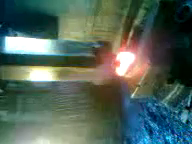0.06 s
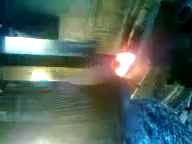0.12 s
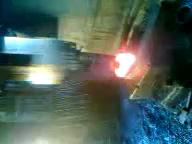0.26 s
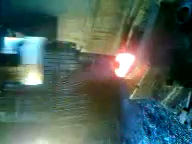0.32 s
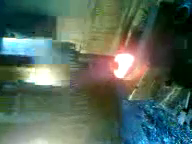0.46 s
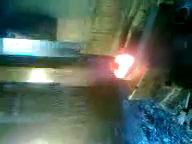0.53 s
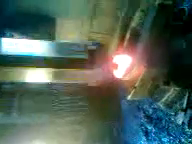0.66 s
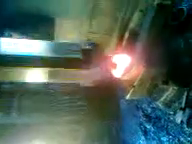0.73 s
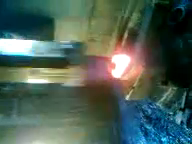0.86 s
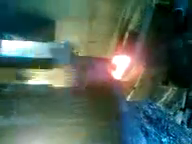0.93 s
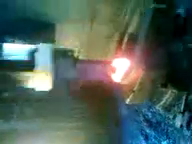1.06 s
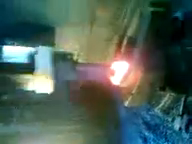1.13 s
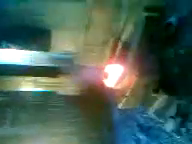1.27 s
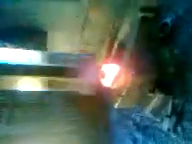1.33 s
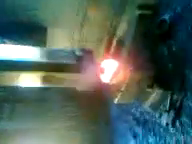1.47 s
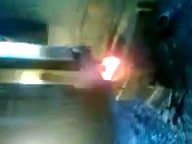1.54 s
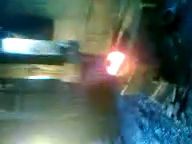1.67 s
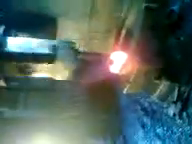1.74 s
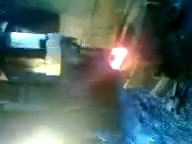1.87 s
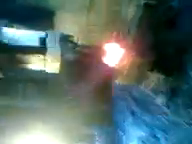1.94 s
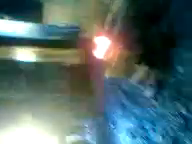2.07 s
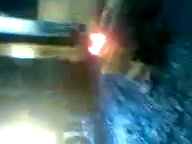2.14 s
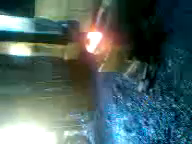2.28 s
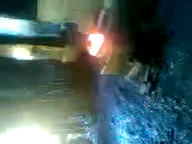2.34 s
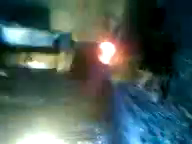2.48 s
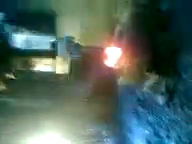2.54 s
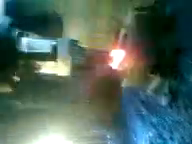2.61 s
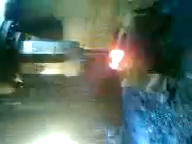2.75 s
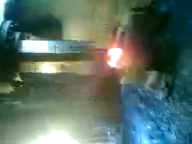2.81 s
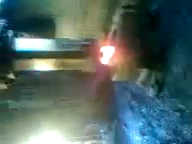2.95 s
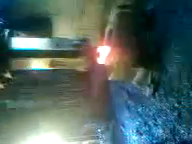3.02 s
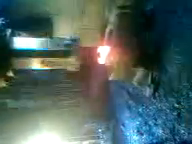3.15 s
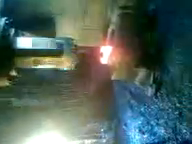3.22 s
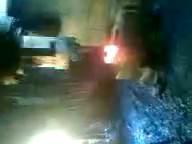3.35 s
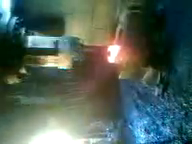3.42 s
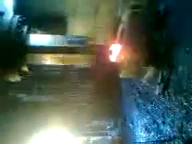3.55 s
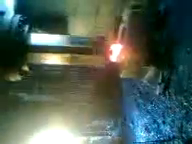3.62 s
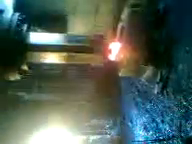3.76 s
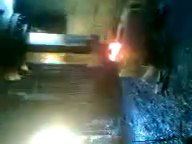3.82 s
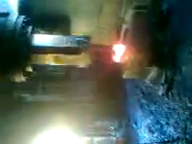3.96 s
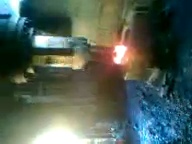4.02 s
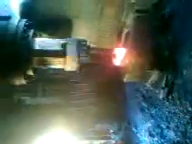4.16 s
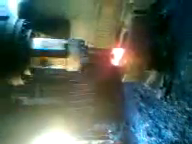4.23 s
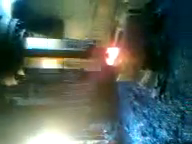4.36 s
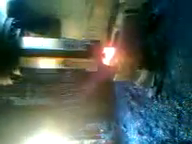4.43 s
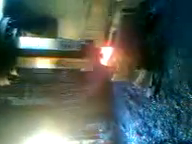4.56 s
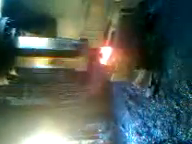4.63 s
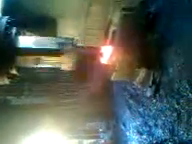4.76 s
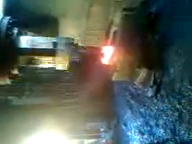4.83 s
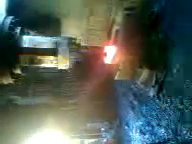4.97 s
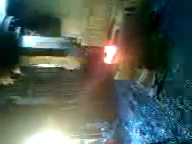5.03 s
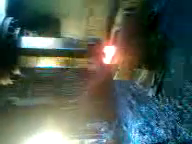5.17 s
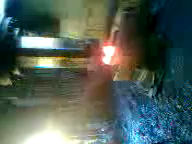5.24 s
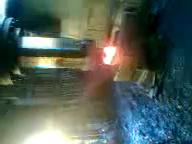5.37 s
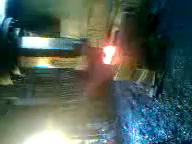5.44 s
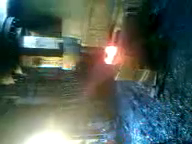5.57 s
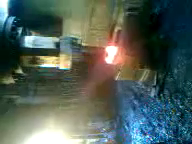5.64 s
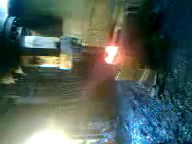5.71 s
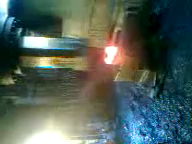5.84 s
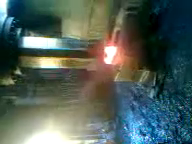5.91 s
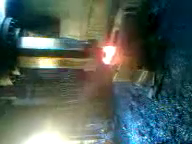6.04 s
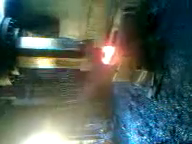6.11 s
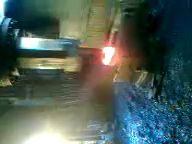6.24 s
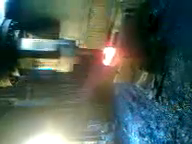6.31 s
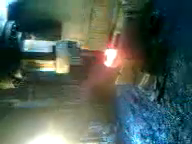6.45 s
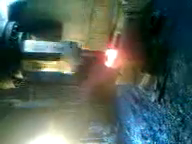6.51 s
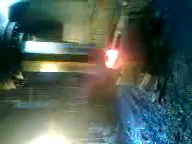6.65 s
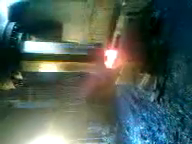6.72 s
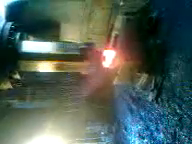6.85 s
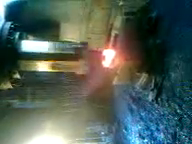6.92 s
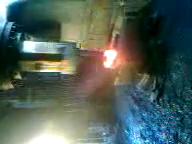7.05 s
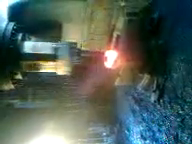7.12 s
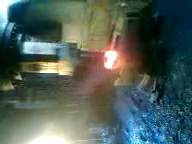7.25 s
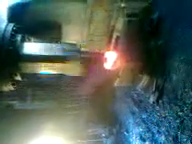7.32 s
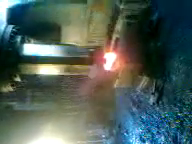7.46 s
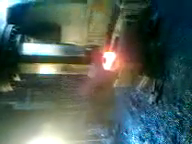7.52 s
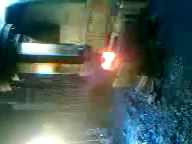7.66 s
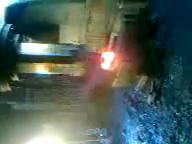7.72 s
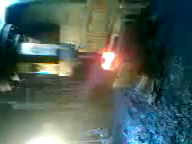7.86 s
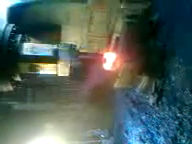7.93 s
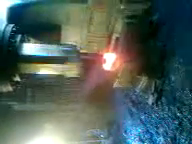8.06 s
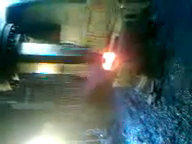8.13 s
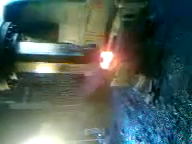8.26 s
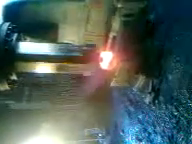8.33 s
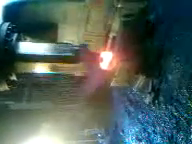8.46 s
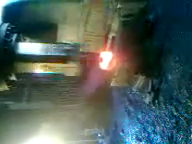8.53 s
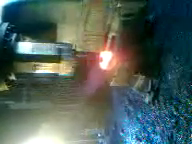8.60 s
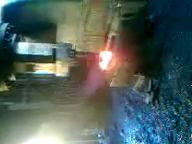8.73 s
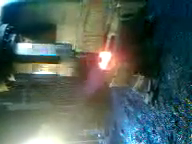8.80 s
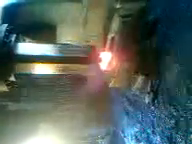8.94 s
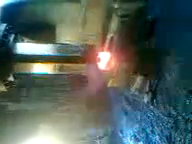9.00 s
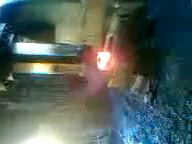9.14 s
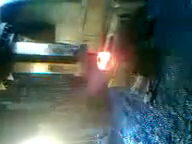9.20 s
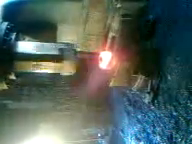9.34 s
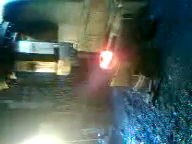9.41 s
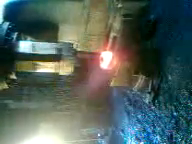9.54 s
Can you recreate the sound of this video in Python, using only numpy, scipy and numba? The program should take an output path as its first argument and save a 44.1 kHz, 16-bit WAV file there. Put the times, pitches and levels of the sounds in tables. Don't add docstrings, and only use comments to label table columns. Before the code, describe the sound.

Furnace roar and motor drone with a few loose steel clanks open the scene, then a power hammer begins striking hot steel every three quarters of a second. Each blow is a flat, overloaded, darkening burst that stops abruptly, followed by hall echo and metallic ringing. Noise suppression on the narrow-band phone microphone swallows the tails, leaving near-silent gaps.

```python
import sys
import numpy as np
from scipy import signal
from scipy.fft import rfft, irfft, next_fast_len
from scipy.io import wavfile
from scipy.ndimage import uniform_filter1d
from numba import njit

SR = 44100
rng = np.random.default_rng(int(sys.argv[2]) if len(sys.argv) > 2 else 0)


def makeup_ratio(level_db):
    decades = np.asarray(level_db, float) / 20
    return 10 ** decades


def bounce(signal):
    frames = np.transpose(np.atleast_2d(signal))
    limited = np.clip(frames, -1, 1)
    pcm = np.round(limited * 32767).astype(np.int16)
    wavfile.write(sys.argv[1], SR, pcm)


N = 422478

# pitch_hz, level_db (per Hz)
SHOP_COLOUR = [(18, -44), (30, -25.5), (134, -12.5), (194, -20), (264, -1), (520, -9), (639, -9),
               (1020, -32), (1640, -1), (2020, -21), (2420, -16), (3170, -31), (4050, -25), (5260, -73.5),
               (8910, -120)]
# pitch_hz, level_db (per Hz)
OPEN_COLOUR = [(18, -46), (30, -21), (207, -15.5), (293, -3), (352, -7.5), (489, -5.5), (737, -10),
               (851, -9), (1180, -13), (2060, -11), (2230, -8.5), (3170, -15), (4050, -20.5), (5260, -62),
               (8910, -120)]
# time_s, level_db
OPEN_LEVELS = [
    (0.0, -25.5),
    (0.075, -25.5),
    (0.2, -23),
    (0.45, -26),
    (0.72, -26.5),
]
# start_s, peak_db
CLANKS = [
    (0.078, -5.5),
    (0.116, -8),
    (0.169, -17.5),
    (0.334, -14),
    (0.45, -18),
]
# start_s, overload_s, roar_db, roar_centre_hz, crash_db (against the roar)
BLOWS = [(0.738, 0.090, -12, 624, -5), (1.497, 0.117, -12.5, 639, -2.5), (2.261, 0.1, -14.5, 780, -4),
         (3.036, 0.095, -15, 640, -7), (3.785, 0.053, -13.5, 745, -13.5), (4.539, 0.117, -14.5, 704, -12.5),
         (5.296, 0.105, -13.5, 710, -8.5), (6.065, 0.145, -14.5, 642, -4.5),
         (6.824, 0.074, -16.5, 756, -4.5), (7.566, 0.128, -14.5, 698, -6.5), (8.320, 0.07, -17, 595, -3.5),
         (9.080, 0.104, -16, 777, -8)]
# centre_sinks_hz, crash_fades_db, roar_changes_db, thud_grows_db
ENDINGS = [(60, 15, -2, 5.5), (190, 27.5, 0, 6), (200, 29, 0.2, 6), (60, 22, 1.2, 3), (40, 9, -3, 6.5),
           (70, 22, 1, 2.5), (90, 28.5, -1, 4), (200, 30, -0.5, 6), (160, 22.5, 2, 3), (190, 21, -0.5, 5.5),
           (5, 23, 2.5, -1), (140, 18.5, 3, -1)]
# pitch_hz, level_db (per Hz)
ROAR_COLOUR = [(18, -54.5), (30, -35.5), (91, -32), (152, -14), (441, -1), (600, -4.5), (784, -7.5),
               (1360, -11.5), (1710, -10.5), (1860, -13.5), (2330, -20.5), (3100, -21), (4050, -23),
               (5260, -70.5), (8910, -120)]
# middle_s, length_s, depth_db
ROAR_DIPS = [(2.318, 0.0092, 6), (4.6, 0.016, 3.6), (5.386, 0.016, 10), (7.681, 0.013, 9.1),
             (9.14, 0.01, 2.1)]
# start_s, peak_db
CRACKLES = [(0.7502, -19.5), (0.7533, -18.5), (0.7668, -42.5), (0.776, -24), (0.792, -36.5), (0.8083, -30),
            (1.514, -33.5), (1.533, -39.5), (3.797, -55.5), (5.303, -49), (6.075, -53.5), (9.094, -56)]
# pitch_hz, level_db (per Hz)
HALL_COLOUR = [(18, -64.5), (30, -12), (158, -19.5), (367, -1), (693, -6), (768, -6), (924, -5),
               (1390, -8.5), (1680, -11.5), (1860, -5.5), (2280, -14.5), (3170, -19), (4050, -19),
               (5260, -69.5), (8910, -120)]
# pitch_hz, width_hz, level_db (against the treble)
UPPER_RINGS = [(2590, 40.0, -17)]
# level_db, brightness_db, fall_db_per_s, bass_shut_s, treble_shut_s (suppressor closes)
ECHOES = [(-20.5, 2.5, 44.5, 0.397, 0.38), (-23, 0.5, 62, 0.38, 0.42), (-30.5, 1.5, 47.5, 0.4, 0.39),
          (-30, 0.6, 44, 0.42, 0.28), (-26.5, 0.8, 47.5, 0.39, 0.41), (-25, 0.4, 51.5, 0.44, 0.43),
          (-25.5, -1, 48.5, 0.41, 0.38), (-30.5, -0.3, 36, 0.53, 0.41), (-26, -1.5, 41, 0.412, 0.34),
          (-24.5, 0, 45.5, 0.485, 0.48), (-26.5, 0, 43.5, 0.47, 0.44), (-26.5, -0.25, 39.5, 0.44, 0.38)]
# time_s, level_db
LEFTOVER = [
    (0.74, -37),
    (1.451, -42.5),
    (1.95, -55.5),
    (4.398, -56),
    (6.7, -62),
    (9.58, -64.5),
]
# pitch_hz, width_hz
RINGS = [
    (367, 4.0),
    (785, 70.0),
    (1838, 3.0),
    (3055, 34.0),
]
# frame_db, die_db, anvil_db, ram_db
RINGING = [(-38.5, -13.5, -26.5, -24.5), (-48.5, -27.5, -33.5, -32.5), (-53, -32, -43.5, -29.5),
           (-38.5, -28, -34, -40.5), (-37.5, -24.5, -32.5, -36.5), (-35.5, -23.5, -19, -48.5),
           (-32, -27, -27, -49), (-26, -42, -30.5, -41), (-26, -30, -30, -51.5), (-25.5, -31.5, -33.5, -48),
           (-26.5, -32, -35, -60), (-30.5, -33.5, -24, -50)]
# frame_held_s, frame_fall_db_per_s, anvil_held_s, anvil_fall_db_per_s
HELD = [(0.68, 10, 0.37, 17), (0.26, 28, 0.28, 26.5), (0.47, 10, 0.4, 13), (0.407, 11, 0.34, 19),
        (0.407, 5.5, 0.368, 21), (0.36, 33, 0.668, 33), (0.41, 7, 0.453, 34), (0.496, 20.5, 0.37, 21),
        (0.633, 8.5, 0.16, 42), (0.495, 23.5, 0.51, 31.5), (0.468, 16.5, 0.4, 22), (0.43, 6, 0.7, 20.5)]
# middle_s, length_s, depth_db
FRAME_DIPS = [(0.94, .04, 3), (3.28, .05, 10), (3.95, 0.053, 10), (4.04, 0.063, 19), (5.45, 0.063, 14),
              (5.545, 0.062, 16), (6.23, 0.033, 7), (6.355, 0.028, 5), (6.97, 0.073, 15), (7.08, 0.046, 13),
              (7.14, 0.032, 8), (7.355, 0.29, 13.5), (7.9, .05, 3), (8.43, 0.043, 5), (8.5, .03, -1),
              (8.66, 0.04, 26), (9.265, 0.035, 8), (9.395, 0.04, 2)]
DIE_DIPS = [(0.895, 0.032, 4.5), (0.95, 0.034, 10), (2.41, 0.026, 12), (3.31, 0.038, 8), (3.87, 0.027, 17),
            (4.04, 0.04, 6.1), (4.76, 0.12, 12), (5.5, .12, 8), (7.1, .05, 14), (7.17, .04, 11)]
ANVIL_DIPS = [(0.94, .06, 10), (3.24, .04, 8), (3.845, .04, 16), (4.02, .09, 10), (4.62, .14, 6),
              (4.815, .04, 8), (4.91, .04, 6), (5.4, .04, 16), (5.57, .09, 15), (6.2, .06, 8),
              (6.33, .08, 20), (7.03, .05, 12), (7.79, .04, 10), (8.47, .08, 10), (9.16, .045, 16),
              (9.232, .035, 14), (9.298, .035, 18), (9.405, .04, 9), (9.49, .05, 4)]

LOW_TOP_HZ, HIGH_FROM_HZ = 850, 1900
SHUT_DB, SHUT_S = 9, .05
DROP_DB = 22
DIP_EDGE_S = 0.015


def rms_one(x):
    return x / np.sqrt(np.mean(x ** 2) + 1e-20)


def drift(rate):
    return rms_one(np.interp(np.arange(N) * rate / SR, np.arange(2000), rng.standard_normal(2000)))


def coloured(x, spectrum, low_hz=20, high_hz=6000):
    size = next_fast_len(N)
    hz = np.arange(size // 2 + 1) * SR / size + 1
    pitch_hz, level_db = np.transpose(spectrum)
    shape = makeup_ratio(np.interp(np.log(hz), np.log(pitch_hz), level_db))
    shape = shape / (1 + (low_hz / hz) ** 8) / (1 + (hz / high_hz) ** 8)
    return rms_one(irfft(rfft(x, size) * shape, size)[:N])


def sparse(per_s, spread_db):
    fires = rng.random(N) < per_s / SR
    signs = rng.choice([-1, 1], N)
    return 1e-18 + fires * signs * makeup_ratio(spread_db * rng.standard_normal(N))


def resonance(x, hz, width_hz):
    r = np.exp(-np.pi * width_hz / SR)
    return rms_one(signal.lfilter([1, 0, -1], [1, -2 * r * np.cos(2 * np.pi * hz / SR), r * r], x))


@njit
def gliding(x, hz, r):
    y = np.zeros(len(x))
    for i in range(2, len(x)):
        y[i] = x[i] - x[i - 2] + 2 * r * np.cos(2 * np.pi * hz[i] / SR) * y[i - 1] - r * r * y[i - 2]
    return y


def since_blow():
    t, starts = np.arange(N) / SR, np.array(BLOWS)[:, 0]
    latest = np.maximum(np.searchsorted(starts, t) - 1, 0)
    return latest, np.maximum(t - starts[latest], 0), t >= starts[0]


def dips(rows):
    out, t = np.zeros(N), np.arange(N) / SR
    for middle_s, length_s, depth_db in rows:
        near = slice(int((middle_s - length_s) * SR), int((middle_s + length_s) * SR))
        inside_s = length_s / 2 - np.abs(t[near] - middle_s)
        out[near] -= depth_db * np.clip(inside_s / min(DIP_EDGE_S, length_s / 2), 0, 1)
    return out


def shut(since, after_s, depth_db):
    return -depth_db * np.clip((since - after_s) / SHUT_S + .5, 0, 1)


def steady_shop():
    return makeup_ratio(-55 + 1.0 * drift(27.0)) * coloured(sparse(per_s=22000.0, spread_db=2.5), SHOP_COLOUR)


def open_shop():
    s, db = np.transpose(OPEN_LEVELS)
    first_s = BLOWS[0][0]
    level_db = np.interp(np.arange(N) / SR, [*s, first_s, first_s + .06], [*db, db[-1], -99])
    furnace = coloured(sparse(per_s=3000.0, spread_db=-1.0), OPEN_COLOUR) * makeup_ratio(1.2 * drift(40.0))
    drone = resonance(rng.standard_normal(N), 292, 23.0)
    return makeup_ratio(level_db - 2.0) * (furnace + makeup_ratio(-10) * drone)


def clanks(t60=0.22):
    t, shape = np.arange(N) / SR, np.zeros(N)
    for s, db in CLANKS:
        shape += (t > s) * makeup_ratio(db - 11.5 - 60 * np.maximum(t - s, 0) / t60)
    return shape * coloured(sparse(per_s=2400.0, spread_db=1.5), HALL_COLOUR, low_hz=604.0)


def blows(width_hz=295.0, broad_db=-5.0, drive=0.4, chatter_db=2.5):
    latest, since, begun = since_blow()
    _, length, roar_db, centre_hz, crash_db = np.array(BLOWS)[latest].T
    gate = begun * np.clip(since / .0025, 0, 1) * np.clip(1 - (since - length) / .002, 0, 1)
    done = np.minimum(since / length, 1)
    sink_hz, fade_db, change_db, growth_db = np.array(ENDINGS)[latest].T
    roar_db = roar_db + change_db * done + dips(ROAR_DIPS)
    centre_hz = centre_hz - sink_hz * done
    crash_db = crash_db - fade_db * done ** 1.58

    pulses = sparse(per_s=2500.0, spread_db=3.5)
    roar = rms_one(gliding(pulses, centre_hz, np.exp(-np.pi * width_hz / SR)))
    thud = makeup_ratio(broad_db + growth_db * (done + 0.5)) * coloured(pulses, ROAR_COLOUR, high_hz=676)
    clang = makeup_ratio(0.52 * crash_db + 6.0) * coloured(pulses, ROAR_COLOUR, low_hz=750, high_hz=1420)
    roar = rms_one(roar + thud + clang)
    roar = np.tanh(roar * makeup_ratio(chatter_db * drift(90.0)) * drive / 2)
    roar = rms_one(signal.sosfilt(signal.butter(2, 1600, fs=SR, output="sos"), roar))
    roar = rms_one(roar / uniform_filter1d(roar ** 2, size=500) ** .3)

    crash = coloured(sparse(per_s=1100.0, spread_db=-0.5), ROAR_COLOUR, low_hz=1553)
    crash = crash * makeup_ratio(3.8 * drift(70.0))
    squashed = 2.3 * np.tanh((roar + makeup_ratio(crash_db) * crash) / 2.1)
    squashed = signal.sosfilt(signal.butter(4, 4000, fs=SR, output="sos"), squashed)
    return gate * makeup_ratio(roar_db) * squashed


def crackles():
    slivers = np.zeros(N)
    for s, db in CRACKLES:
        slivers[round(s * SR)] = makeup_ratio(db + 13.0)
    slivers = signal.sosfilt(signal.butter(2, 6000.0, fs=SR, output="sos"), slivers + 1e-18)
    return signal.sosfilt(signal.butter(4, 4400, "high", fs=SR, output="sos"), slivers)


def echo_levels():
    latest, since, begun = since_blow()
    level_db, bright_db, fall_db, bass_s, treble_s = np.array(ECHOES)[latest].T
    left_db = np.interp(np.arange(N) / SR, *np.transpose(LEFTOVER))
    late = np.maximum(since, np.array(BLOWS)[latest, 1])
    # echo offset in dB, share of the fall, leftover offset in dB, shutting time in s
    ranges = [(-1, 0.85, 0.5, bass_s), (-4, 1.17, -3.3, (bass_s + treble_s) / 2), (-1, 1.256, 1.7, treble_s)]
    levels = []
    for k, (offset_db, fall_share, left_offset_db, shut_s) in enumerate(ranges):
        echo_db = level_db + offset_db + k * bright_db - fall_db * fall_share * late
        echo_db = echo_db + shut(since, shut_s, SHUT_DB)
        both = np.hypot(makeup_ratio(echo_db), makeup_ratio(left_db + left_offset_db))
        levels.append(np.where(begun, 20 * np.log10(both), -99))
    return levels


def hall(low_db, middle_db, high_db, patchy_db=2.0):
    high_db = np.minimum(high_db, middle_db + 8)
    pulses, together = sparse(per_s=3000.0, spread_db=1.0), drift(25.0)
    ranges = [(low_db + 2.0, 20, LOW_TOP_HZ),
              (middle_db + 0.043, LOW_TOP_HZ, HIGH_FROM_HZ),
              (high_db + 0.036, HIGH_FROM_HZ, 6000)]
    out = np.zeros(N)
    for db, low_hz, high_hz in ranges:
        flicker_db = patchy_db * (.7 * together + drift(40.0))
        out += makeup_ratio(db + flicker_db) * coloured(pulses, HALL_COLOUR, low_hz, high_hz)
    for hz, width_hz, db in UPPER_RINGS:
        out += makeup_ratio(high_db + db + 3 * drift(12)) * resonance(rng.standard_normal(N), hz, width_hz)
    return out


def ring_levels():
    latest, since, begun = since_blow()
    frame_s, frame_fall, anvil_s, anvil_fall = np.array(HELD)[latest].T
    closing = shut(since, np.array(ECHOES)[latest, 3], SHUT_DB)
    frame, die, anvil, ram = np.array(RINGING)[latest].T
    levels = [frame - frame_fall * since + shut(since, frame_s, DROP_DB) + dips(FRAME_DIPS),
              die - 42.5 * since + closing + dips(DIE_DIPS),
              anvil - anvil_fall * since + shut(since, anvil_s, DROP_DB) + dips(ANVIL_DIPS),
              ram - 53 * since + closing]
    masked_db = 8 * np.clip((np.array(BLOWS)[latest, 1] - since) / DIP_EDGE_S, 0, 1)
    return np.where(begun, levels - masked_db, -99)


def rings(levels_db):
    out = np.zeros(N)
    for (hz, width_hz), db in zip(RINGS, levels_db):
        if width_hz > 10:
            tone = resonance(resonance(rng.standard_normal(N), hz, width_hz), hz, 3 * width_hz)
        else:
            tone = np.sqrt(2) * np.sin(2 * np.pi * np.cumsum(hz + width_hz * drift(30)) / SR)
        out += makeup_ratio(db - .4 + 1.1 * drift(40)) * tone
    return out


def scene():
    before = steady_shop() + open_shop() + clanks()
    return (before + blows() + hall(*echo_levels()) + rings(ring_levels()))[None]


def top_cut(x):
    return signal.sosfilt(signal.butter(12, 16000, fs=SR, output="sos"), x)


def record(dry):
    mirror = dry * np.cos(2 * np.pi * 8000 * np.arange(N) / SR)
    mirror = signal.sosfilt(signal.cheby2(4, 60, [3300, 5200], "band", fs=SR, output="sos"), mirror)
    narrow = signal.sosfilt(signal.butter(2, 70, "high", fs=SR, output="sos"), dry + makeup_ratio(8) * mirror)
    clip_level = .714
    size = np.tanh((np.abs(narrow) / clip_level) ** 3) ** (1 / 3)
    narrow = clip_level * size * np.sign(narrow)
    narrow = signal.sosfilt(signal.cheby2(8, 60, 4750, fs=SR, output="sos"), narrow)
    return top_cut(narrow + crackles())


dry = scene()
out = record(dry)
bounce(out)
```